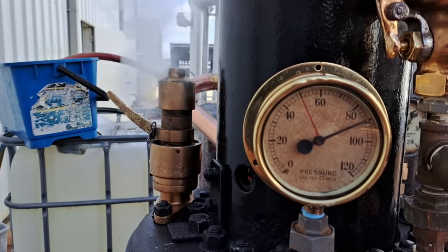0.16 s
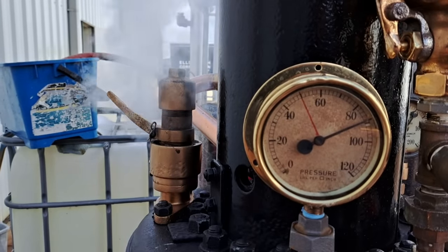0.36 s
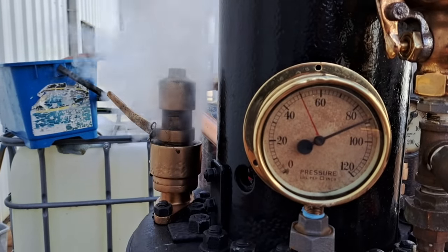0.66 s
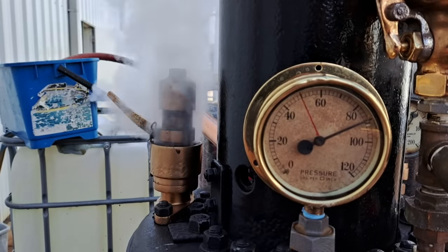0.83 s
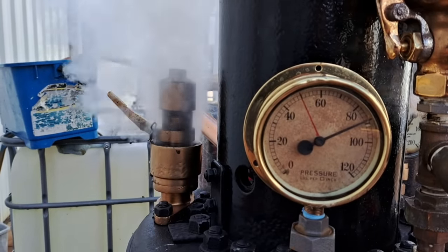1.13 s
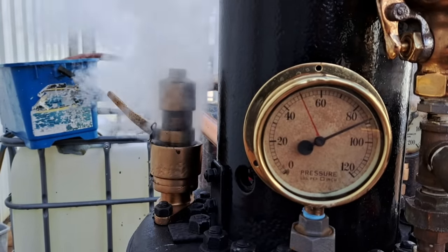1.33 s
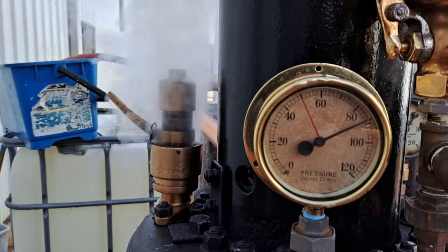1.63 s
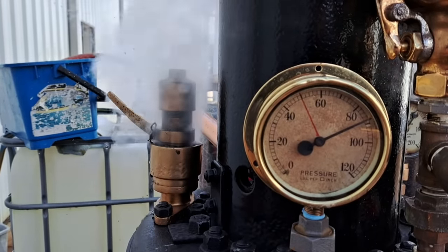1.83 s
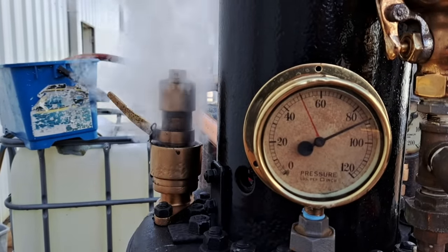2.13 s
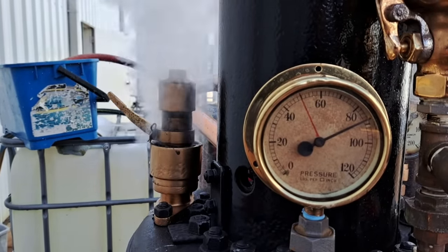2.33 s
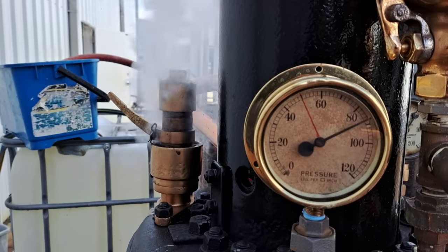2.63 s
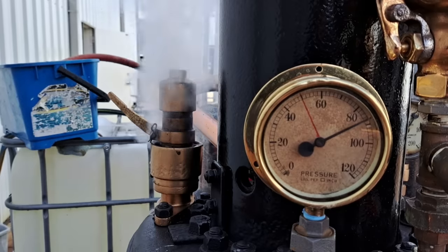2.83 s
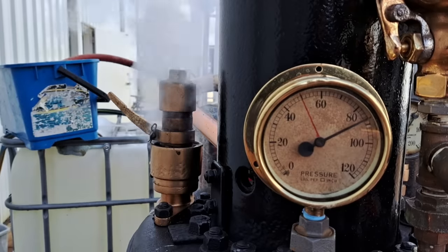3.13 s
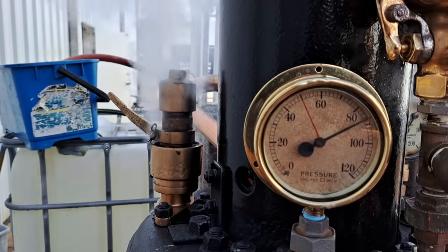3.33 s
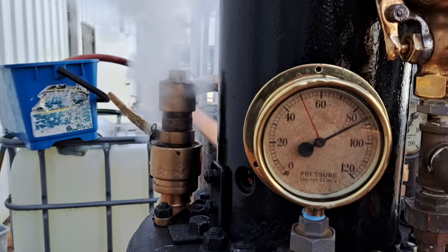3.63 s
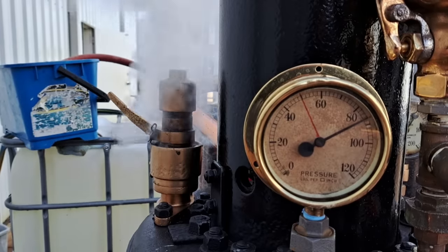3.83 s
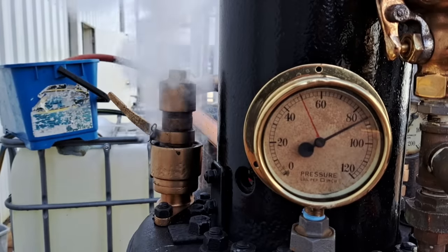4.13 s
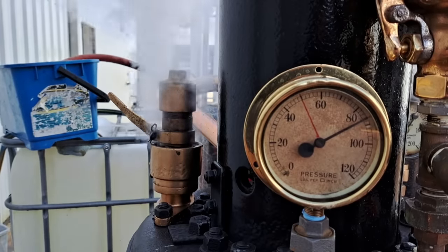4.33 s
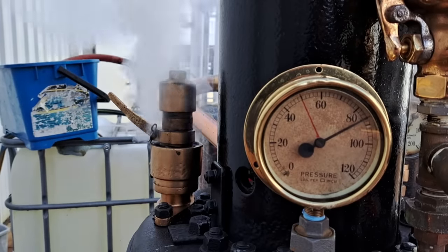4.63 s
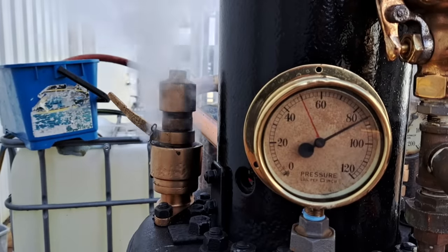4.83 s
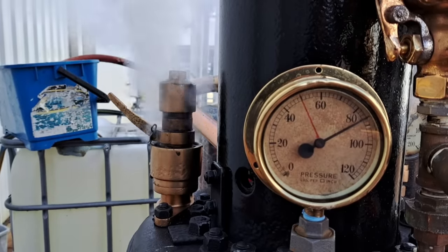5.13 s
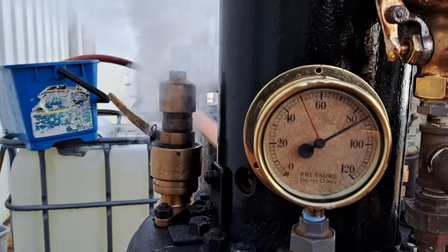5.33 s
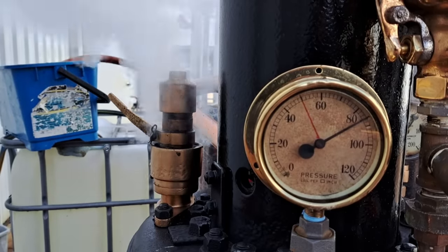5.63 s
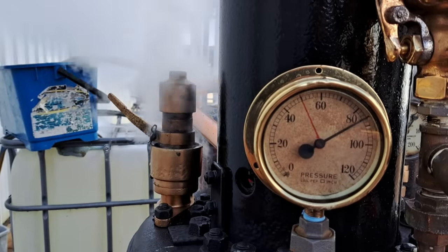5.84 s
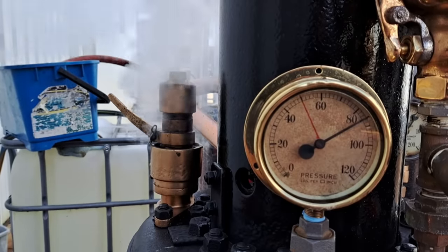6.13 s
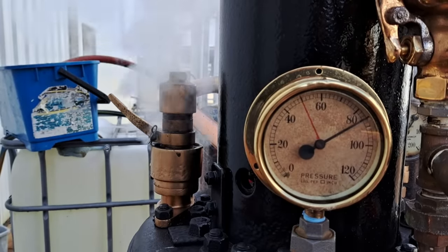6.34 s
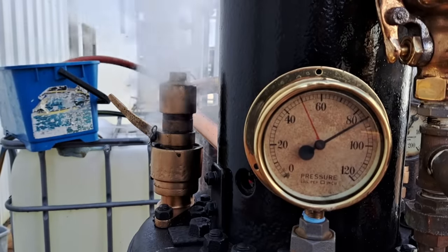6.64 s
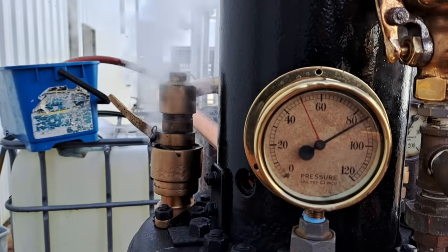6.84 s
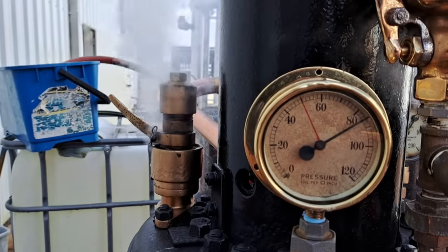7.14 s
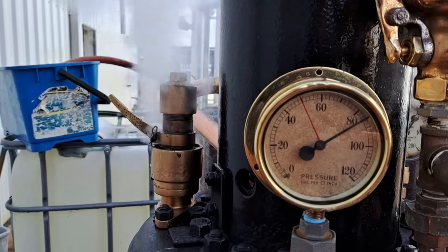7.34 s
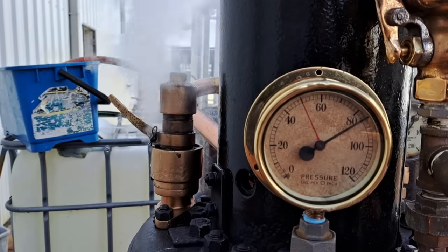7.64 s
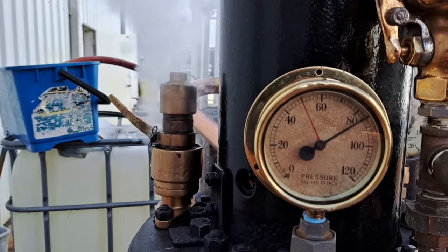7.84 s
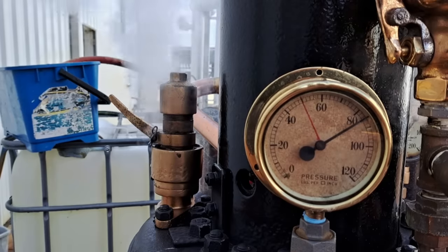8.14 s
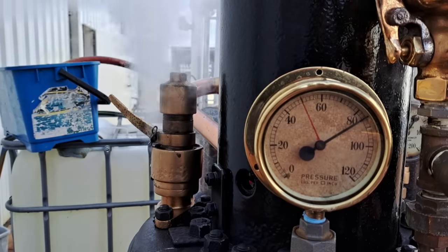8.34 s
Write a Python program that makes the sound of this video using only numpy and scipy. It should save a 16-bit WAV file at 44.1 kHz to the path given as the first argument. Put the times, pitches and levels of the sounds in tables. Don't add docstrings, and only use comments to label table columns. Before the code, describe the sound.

A boiler safety valve vents steam at arm's length, heard in close, wide stereo. From 0 s the jet is already blowing: a continuous bright hiss over a breathy roar, finely fluttering and coloured by very short reflections from metal. A draught brushes the left microphone until about 1.1 s, with brief faint puffs afterwards and a stronger one near 3.3 s. The initially sharp hiss softens around 0.9 s, then the jet swells from 2 to 3 s into a fuller, louder rush and holds. At about 5.2 s a thin, very high leak bursts open on the left and continues, easing slightly after 7.3 s. Small dull drop thumps touch the left microphone at 5.4, 6.2 and 6.9 s, the last strongest. Low fire rumble and a faint distant engine idle sit beneath everything. The steam is still blowing at the end, about 8.5 s.

```python
import sys
import numpy as np
from scipy import signal
from scipy.fft import rfft, irfft, next_fast_len
from scipy.io import wavfile
from scipy.ndimage import uniform_filter1d

SR = 44100
rng = np.random.default_rng(int(sys.argv[2]) if len(sys.argv) > 2 else 0)


def materialize(psi):
    bounded = np.clip(np.atleast_2d(psi).T, -1, 1)
    quanta = np.round(bounded * 32767).astype(np.int16)
    wavfile.write(sys.argv[1], SR, quanta)


def makeup_ratio(level_db):
    decades = np.asarray(level_db, float) / 20
    return 10 ** decades


N = 373554
T = np.arange(N) / SR
SIZE = next_fast_len(N)
HZ = np.arange(SIZE // 2 + 1) * SR / SIZE + 1e-3


def curve(table):
    s, *columns = np.transpose(table)
    return [np.interp(T, s, c) for c in columns]


def across(table):
    hz, *columns = np.transpose(table)
    return [np.interp(np.log(HZ), np.log(hz), c) for c in columns]


def through(x, response):
    return irfft(rfft(x, SIZE) * response, SIZE)[..., :N]


def unit(x):
    return x / np.sqrt(np.mean(x ** 2))


def walk(rate_hz):
    hold = int(SR / rate_hz)
    steps = np.repeat(rng.standard_normal(N // hold + 1), hold)
    slewed = uniform_filter1d(uniform_filter1d(steps, hold), hold)
    return unit(slewed[:N])


def ramp(start_s, length_s):
    return np.clip((T - start_s) / length_s, 0, 1)


def coloured(table, channels=1):
    white = rng.standard_normal((channels, N))
    return unit(through(white, makeup_ratio(across(table)[0])))


def engine():
    # freq_hz, level_db
    orders = [(49.5, -58.5), (74.5, -62), (177, -61), (231, -60)]
    waver_hz, likeness, steady = 6, .5, 2.2
    swell_db, peak_s, period_s = 1.7, 3.4, 5
    out = 0
    for hz, db in orders:
        both = walk(waver_hz) + 1j * walk(waver_hz) + steady
        apart = walk(waver_hz) * np.array([[1], [-1]])
        waver = np.sqrt(likeness) * both + np.sqrt(1 - likeness) * apart
        out = out + makeup_ratio(db) * (waver / 1.56 * np.exp(2j * np.pi * hz * T)).real
    return out * makeup_ratio(swell_db * np.cos(2 * np.pi * (T - peak_s) / period_s))


def firebox():
    # freq_hz, density_db (per Hz)
    colour = [(20, -13), (34, -5), (50, -1), (75, -3.5), (95, -11), (125, -3.5), (230, -1.5), (450, -3.5),
              (700, -22.5)]
    rumble_db, likeness = -45, 0.47
    start_db, rise_s, swell_db, flicker_db = -3.5, 0.41, 0.2, 1.5
    both, left, right = coloured(colour, channels=3)
    pair = np.sqrt(likeness) * both + np.sqrt(1 - likeness) * np.array([left, right])
    rise_db = start_db * np.exp(-(T / rise_s) ** 2)
    return pair * makeup_ratio(rumble_db + rise_db + swell_db * walk(2.56) + flicker_db * walk(6.4))


def gusts():
    # start_s, length_s, draught_db, bass_cut_db (wind filter)
    gust_list = [
        (-.1, 1.17, -32.5, -13),
        (1.38, .16, -52, -12),
        (2.3, .16, -53, -10),
        (2.72, .07, -55, -9),
        (3.02, .08, -55, -7),
        (3.32, 0.29, -44, -9),
        (4.12, .1, -55, -9),
    ]
    edge_s, fade_db_per_s, fade_after_s = .07, -8, .35
    calm_db, breeze_cut_db, breeze_ends_s = -51, -1, 4.4
    size = makeup_ratio(calm_db)
    cut_db = breeze_cut_db * (1 - ramp(breeze_ends_s, edge_s))
    for start_s, length_s, db, gust_cut_db in gust_list:
        edge_start_s = start_s - edge_s / 2
        on = ramp(edge_start_s, edge_s) - ramp(edge_start_s + length_s, edge_s)
        fade_db = fade_db_per_s * np.maximum(T - start_s - fade_after_s, 0)
        size = size + on ** 2 * makeup_ratio(db + fade_db)
        cut_db = cut_db + on * (gust_cut_db - breeze_cut_db)
    return size, cut_db


def draught():
    # freq_hz, density_db (per Hz)
    colour = [(250, -26), (340, 5), (700, 1.5), (1500, -4), (2500, -9), (4000, -28)]
    left = coloured(colour)[0] * gusts()[0] * makeup_ratio(2.4 * walk(12.0))
    return np.array([left, 0 * left])


def drops():
    # hit_s, peak_db, push_ms
    hits = [
        (3.27, -31, 8.7),
        (5.417, -27, 5.4),
        (6.2242, -19, 4.1),
        (6.876, -17, 4.2),
        (6.891, -32, 7.5),
        (7.22, -34, 5.0),
    ]
    ring_hz, ring_db, ring_ms, pull_slower = 58, -11, 22, 1.7
    left = np.zeros(N)
    for hit_s, db, push_ms in hits:
        near = slice(int((hit_s - .02) * SR), int((hit_s + .15) * SR))
        t = T[near] - hit_s
        cycles = t * 1000 / push_ms - .25
        cycles = np.where(cycles > 0, cycles / pull_slower, cycles)
        push = np.sin(2 * np.pi * cycles) * np.exp(-((cycles + 0.087) / 0.37) ** 2)
        swing = np.sin(2 * np.pi * ring_hz * t) * np.exp(-t * 1000 / ring_ms) * (t > 0)
        left[near] -= makeup_ratio(db) * (push + makeup_ratio(ring_db) * swing)
    return np.array([left, 0 * left])


def leak():
    # freq_hz, density_db (per Hz)
    colour = [(3000, -19), (3900, -12), (5500, -16), (6300, -8), (7600, -13.5), (9000, -5.5), (10500, -1),
              (11700, 4.5), (12600, 2.5), (13500, -9), (14500, -3), (15600, -4)]
    opens_s, attack_s, level_db, right_db = 5.166, .007, -14.5, -36
    sags_s, sag_length_s, sag_db = 7.3, 0.16, -1.5
    hiss = coloured(colour)[0] * makeup_ratio(.6 * walk(20))
    hiss = hiss * ramp(opens_s, attack_s) * makeup_ratio(level_db + sag_db * ramp(sags_s, sag_length_s))
    return hiss * makeup_ratio(np.array([[0], [right_db]]))


def turbulence(roar_db, hiss_db, top_db):
    surge_db, neighbour_db, flicker_db, top_flicker_db = 0.44, 0.19, 0.23, .5
    roar_top_hz, hiss_top_hz = 2330, 8300
    centres_hz = np.array([400, 1100, 2200, 3800, 5700, 7800, 10200, 12800, 15500])
    white = rfft(rng.standard_normal((3, SIZE)))
    out, surge, near = 0, walk(18), walk(13)
    for k, hz in enumerate(centres_hz):
        share = np.interp(HZ, centres_hz, np.arange(len(centres_hz)) == k)
        band = irfft(white * share, SIZE)[:, :N]
        near = (near + walk(12)) / np.sqrt(2)
        bright = 1 / (1 + (roar_top_hz / hz) ** 4)
        top = 1 / (1 + (hiss_top_hz / hz) ** 4)
        chance_db = bright * surge_db * surge + neighbour_db * near
        chance_db = chance_db + (flicker_db + top * top_flicker_db) * walk(25)
        out = out + makeup_ratio(roar_db + bright * hiss_db + top * top_db + chance_db) * band
    return out


def valve():
    # time_s, flow_db, sharpness_db
    blow = [(0, -24, 7), (.45, -24.5, 7), (.52, -25, 6), (.84, -24.5, 4), (.95, -24.5, 0.5), (1.9, -23, -1),
            (2.16, -21.5, -3), (2.35, -20.5, -1), (2.9, -19.5, -1.5), (3.4, -19.5, -1), (3.7, -19.5, -1.5),
            (5.1, -19.5, -2.5), (5.4, -20.5, -0.5), (7.1, -21, -1.5), (7.45, -21.5, -2.5), (7.6, -21.5, -2),
            (8.47, -20.5, -2.5)]
    # freq_hz, density_db (per Hz)
    jet = [(495, -15.5), (550, -8), (1000, -3.8), (2000, 0), (2900, -4.2), (3400, -8), (4300, -3.4),
           (5400, -8), (6300, -4.4), (7800, -6.1), (8600, -9), (11000, -11.2), (12300, -4), (15600, -5.3)]
    # freq_hz, right_lag_rad, likeness (0-1), left_minus_right_db
    ports = [(550, .18, .95, .9), (1500, .95, .87, -1), (2300, 2.2, .76, -1.3), (3050, 3.05, .75, .5),
             (3600, 3.1, .64, .7), (4300, 3.2, .77, .9), (5300, 4.17, .46, .5), (5800, 3.22, .5, 2),
             (7300, 3.3, .66, -1.1), (8500, 6, .46, .2), (9800, 7.8, .5, 2.5), (11000, 7.4, .42, 5.5),
             (13200, 7.35, .5, .6), (15600, 11.1, .52, 1.8)]
    # left_ms, right_ms, left_gain, right_gain, centre_hz, spread (log Hz)
    echoes = [(0.698, 0.735, -0.29, -0.38, 5439, 0.18), (0.983, 1.04, 0.2, -0.07, 1426, 0.28),
              (1.509, 1.507, -0.15, -0.72, 10389, 0.24), (1.683, 1.688, -0.21, -0.43, 7298, 0.5),
              (1.922, 1.855, -0.1, 0.45, 11785, 0.18), (2.091, 1.924, -0.2, 0.12, 3257, 0.2),
              (2.134, 2.156, 0.07, 0.3, 5930, 0.17), (2.168, 2.153, 0.26, 0.08, 1180, 0.44),
              (2.916, 2.804, 0.23, 0.09, 2016, 0.23)]
    jet_db = 6.5
    flow_db, sharp_db = curve(blow)
    top_db = 1.44 - 0.24 * sharp_db
    direct, *scattered = turbulence(flow_db, sharp_db, top_db)
    colour = makeup_ratio(across(jet)[0]) * np.minimum(HZ / jet[0][0], 1) ** 0.76
    colour = unit(colour)
    lag_rad, likeness, pan_db = across(ports)
    likeness = np.clip(likeness, 0, 1) ** .92
    out = []
    for port, side in enumerate((1, -1)):
        paths = 1
        for echo in echoes:
            delay_ms, gain, (centre_hz, spread) = echo[port], echo[2 + port], echo[4:]
            band = -(np.log(HZ / centre_hz) / spread) ** 2
            paths = paths + gain * np.exp(-2j * np.pi * HZ * delay_ms / 1000 + band)
        ear = colour * makeup_ratio(jet_db + side * pan_db / 2)
        lag = np.exp(.5j * side * lag_rad)
        alike = through(direct, ear * np.sqrt(likeness) * paths * lag)
        unlike = through(scattered[port], ear * np.sqrt(1 - likeness))
        out.append(alike + unlike)
    return np.array(out)


def scene():
    return engine() + firebox() + draught() + drops() + leak() + valve()


def top_cut(x):
    return signal.sosfilt(signal.butter(12, 15730, fs=SR, output="sos"), x)


def record(dry):
    wind_cut_hz, low_hz, top_hz = 254, 24, 15730
    bass = through(dry[0], 1 / (1 + (HZ / wind_cut_hz) ** 12))
    left = dry[0] + (makeup_ratio(gusts()[1]) - 1) * bass
    clipped = np.clip([left, dry[1]], -1, 1)
    mix = through(clipped, (HZ < top_hz) / (1 + (low_hz / HZ) ** 4))
    return top_cut(mix)


dry = scene()
out = record(dry)
materialize(out)
```